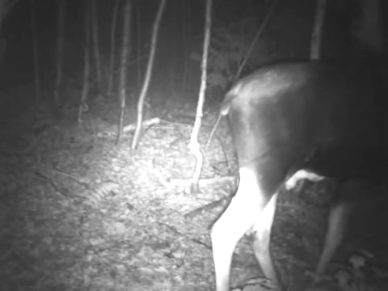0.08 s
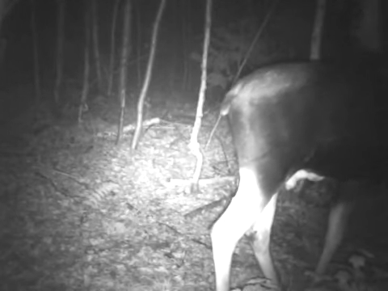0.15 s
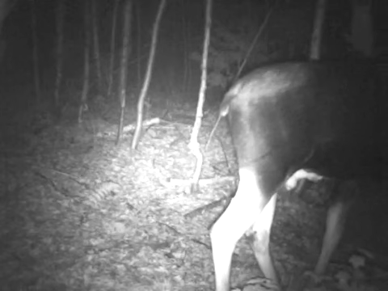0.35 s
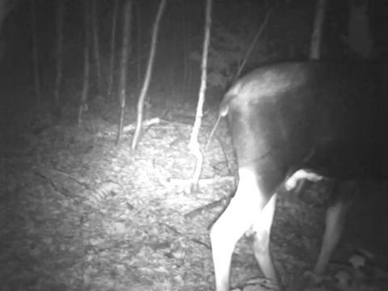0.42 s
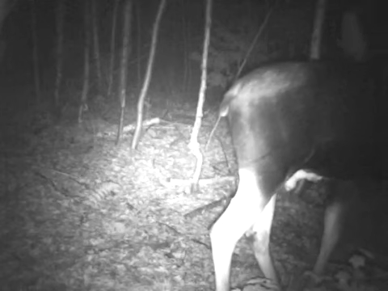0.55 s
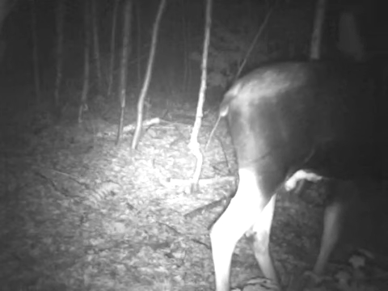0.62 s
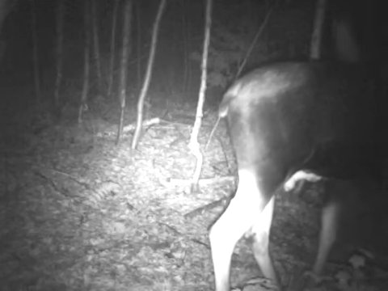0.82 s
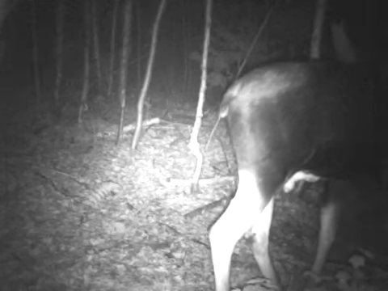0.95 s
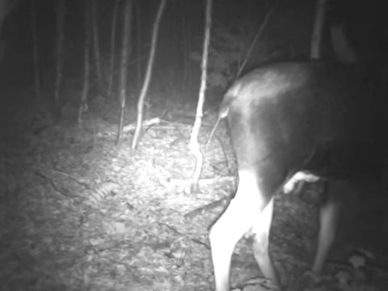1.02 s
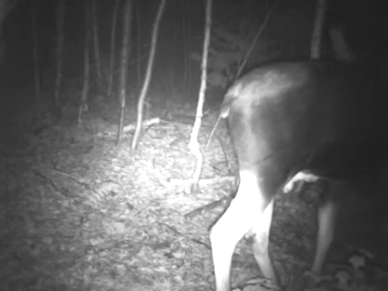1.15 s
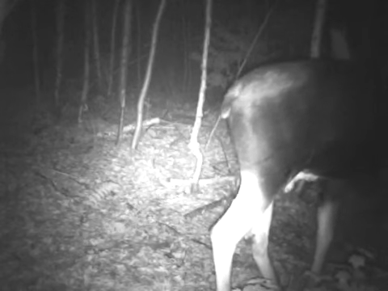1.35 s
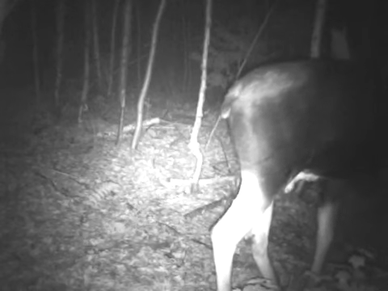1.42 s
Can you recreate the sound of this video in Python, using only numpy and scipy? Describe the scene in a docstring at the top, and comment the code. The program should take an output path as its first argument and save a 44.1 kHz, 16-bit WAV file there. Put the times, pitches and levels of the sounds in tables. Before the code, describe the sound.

A moose gives one short, nasal moan close by, with faint leaves rustling.

```python
"""A cow moose gives one short moan, close by, in a forest at night.
Vocal fold harmonics start as a nasal hum and turn loud as the mouth opens; the pitch sags,
the slack folds creak and a puff of air ends the call. Leaves rustle and twigs snap underfoot.
The trees return a dull tail. Recorder noise swells with the voice over steady microphone hiss."""
import sys
import numpy as np
from scipy import signal
from scipy.fft import rfft, irfft
from scipy.io import wavfile
from scipy.ndimage import uniform_filter1d

SR = 44100
rng = np.random.default_rng(int(sys.argv[2]) if len(sys.argv) > 2 else 0)


def wrap_up_sound(samples):
    """Save the sound to the file named by the first command line argument, as 16-bit audio."""
    columns = np.atleast_2d(samples).T
    # keep every value between -1 and 1, then stretch to whole-number steps
    tamed = np.clip(columns, -1, 1)
    steps = np.round(tamed * 32767).astype(np.int16)
    wavfile.write(sys.argv[1], SR, steps)


N = 66150
T = np.arange(N) / SR
BIN_HZ = np.fft.rfftfreq(N, 1 / SR)


def amp(db):
    """Decibels to gain."""
    return 10 ** (np.asarray(db) / 20)


def unit(x):
    """Scale to rms 1."""
    return x / np.sqrt(np.mean(x ** 2) + 1e-20)


def curves(table):
    """Per-sample curve for each column after time_s."""
    time_s, *columns = np.transpose(table)
    return [np.interp(T, time_s, column) for column in columns]


def at_hz(table, hz):
    """Table lookup on a log-frequency axis."""
    freq_hz, values = np.transpose(table)
    return np.interp(np.log(hz + 1), np.log(freq_hz + 1), values)


def shaped_noise(bin_gain):
    """White noise weighted per FFT bin, rms 1."""
    return unit(irfft(rfft(rng.standard_normal(N)) * bin_gain, N))


def noise(spectrum):
    """Noise coloured by a freq_hz, gain_db table, rms 1."""
    return shaped_noise(amp(at_hz(spectrum, BIN_HZ)))


def wander(rate_hz):
    """Random motion up to about rate_hz, rms 1."""
    return shaped_noise(np.exp(-(BIN_HZ / rate_hz) ** 2))


def ring(start_s, level_db, pitch_hz, t60_s, rise_s):
    """Struck resonance: linear rise, exponential decay."""
    t = np.maximum(T - start_s, 0)
    return np.minimum(t / rise_s, 1) * amp(level_db - 60 * t / t60_s) * np.sin(2 * np.pi * pitch_hz * t)


# time_s, pitch_hz
FOLD_PITCH = [(.03, 399), (.045, 353), (.058, 323.3), (.072, 309.7), (.081, 277), (.097, 257.7),
              (.11, 274.4), (.13, 294), (.16, 302.4), (.215, 309.4), (.27, 303.2), (.33, 291.3),
              (.37, 289.4), (.41, 275.7), (.45, 263), (.485, 252), (.503, 236), (.525, 215)]
# time_s, fundamental_db, overtone_db
VOICE_EFFORT = [(.015, -57, -48), (.035, -34.5, -20), (.052, -40.5, -12), (.09, -53, -5.5),
                (.11, -55.5, -5), (.135, -45, -0.5), (.165, -42.5, 0), (.21, -37, -1), (.3, -40, -.5),
                (.365, -41.5, 1.5), (.41, -32, -0.5), (.445, -32.5, 0.5), (.48, -37.5, -0.5),
                (.515, -52, -3), (.535, -67, -18)]
# time_s, roughness (0-1)
FOLD_ROUGHNESS = [(.05, .08), (.14, .04), (.22, .03), (.28, .18), (.32, .07), (.36, .08), (.383, .22),
                  (.405, .08), (.44, .12), (.48, .1), (.505, .3), (.53, .4)]
# time_s, tension (0 relaxed, 1 pressed)
THROAT_TENSION = [(.245, 0.08), (.295, 0.91), (.37, 1), (.42, 1), (.46, 0.59)]
# freq_hz, gain_db
THROAT_RELAXED = [(530, -38.5), (620, -41), (670, -56.5), (740, -40), (900, -36), (1000, -33.5),
                  (1070, -56), (1200, -45), (1330, -36), (1450, -52), (1550, -44.5), (1700, -40.5),
                  (1830, -45), (1950, -55), (2150, -48), (2450, -53), (2800, -65), (4000, -89)]
THROAT_PRESSED = [(540, -35.5), (580, -31), (870, -32), (1170, -38.5), (1450, -37), (1620, -43),
                  (1750, -34), (1930, -33.5), (2060, -50.5), (2280, -51.5), (2450, -53), (2800, -60),
                  (4000, -79)]
# time_s, level_db, centre_hz, half_width_hz
MOUTH_RESONANCE = [(.108, -59, 1100, 160), (.13, -39, 1120, 161), (.175, -34, 1150, 160),
                   (.2, -29, 1103, 162), (.26, -27, 1134, 163), (.335, -31.5, 1096, 160),
                   (.377, -39, 1121, 180.1), (.384, -20, 1120, 210), (.395, -18, 1065, 257),
                   (.415, -18.5, 1044, 260), (.43, -21.5, 1175, 237), (.448, -11.5, 1270, 185),
                   (.482, -8.5, 1230, 136), (.502, -21.5, 1120, 220), (.508, -28, 1101, 247),
                   (.52, -44, 1085, 250)]


def moan(jitter=0.05, shimmer=0.38, hoarseness=0.75, waver_db=0.76, dull_hz=700):
    """Vocal fold harmonics pass the throat and, once it opens, the resonant mouth."""
    pitch_hz, = curves(FOLD_PITCH)
    fundamental_db, overtone_db = curves(VOICE_EFFORT)
    roughness, = curves(FOLD_ROUGHNESS)
    tension, = curves(THROAT_TENSION)
    mouth_db, centre_hz, half_width_hz = curves(MOUTH_RESONANCE)
    sounding = (T > VOICE_EFFORT[0][0]) & (T < VOICE_EFFORT[-1][0])
    mouth_open = (T > MOUTH_RESONANCE[0][0]) & (T < MOUTH_RESONANCE[-1][0])
    mouth_gain = amp(mouth_db) * mouth_open
    phase = 2 * np.pi * np.cumsum(pitch_hz * (1 + jitter * roughness * wander(rate_hz=117))) / SR
    voice = amp(fundamental_db) * np.cos(phase)
    for harmonic in range(2, 14):
        hz = harmonic * pitch_hz
        effort_db = overtone_db * (hz / dull_hz) ** 0.71  # a soft voice loses its top first
        throat_db = (1 - tension) * at_hz(THROAT_RELAXED, hz) + tension * at_hz(THROAT_PRESSED, hz)
        detune = 1j * (hz - centre_hz) / half_width_hz
        mouth = 1 / ((1 + detune) * (1 + detune + detune ** 2))  # Butterworth band-pass
        gain = np.hypot(amp(effort_db + throat_db), mouth_gain * abs(mouth))
        gain *= amp(waver_db * wander(rate_hz=14))
        tremble = 1 + hoarseness * roughness * (wander(rate_hz=167) + 1j * wander(rate_hz=167))
        carrier = np.exp(1j * (harmonic * phase + np.angle(mouth)))
        voice += gain * (tremble * carrier).real
    return np.sqrt(2) * voice * sounding * (1 + shimmer * roughness * wander(rate_hz=300))


# freq_hz, gain_db, t60_s
MOUTH_MODES = [(850, -8, .019), (1110, -6, .012), (1320, -2, .02)]


def creak(start_s=0.5088, length_s=0.02, rate_hz=205, level_db=-7, spread_db=1.5, fade_db_per_s=130):
    """Slackening folds slap at uneven intervals; each slap rings the mouth."""
    gap_draws, level_draws = rng.uniform(-1.005, 1, (8, 2)).T
    gaps_s = (1 + 0.25 * gap_draws) / rate_hz
    delays_s = np.cumsum(gaps_s) - gaps_s
    slaps_db = level_db + spread_db * level_draws - fade_db_per_s * delays_s
    out = np.zeros(N)
    for delay_s, slap_db in zip(delays_s, slaps_db):
        if delay_s < length_s:
            for freq_hz, gain_db, t60_s in MOUTH_MODES:
                out += ring(start_s + delay_s, slap_db + gain_db, freq_hz, t60_s, rise_s=0.0012)
    return out


# start_s, level_db, pitch_hz, t60_s
MOUTH_POPS = [(0.3802, -10, 1260, 0.036), (.528, -22, 319.2, .09), (0.5283, -27.5, 427, 0.066),
              (.572, -27, 440, .045)]


def pops():
    """Hollow rings as the lips part and the throat closes."""
    return sum(ring(*pop, rise_s=0.0017) for pop in MOUTH_POPS)


# start_s, level_db
PUFF_PUSHES = [(.507, -26.5), (.553, -30.5)]
# freq_hz, gain_db
PUFF_SPECTRUM = [(40, -21), (130, -23), (210, -26), (310, -2.5), (400, 4), (470, 3), (680, -12), (880, 2),
                 (1300, -1), (1700, -14.5), (2300, -25), (5000, -32.5), (10000, -41), (15000, -62)]


def puff(attack_s=0.0042, decay_s=0.037):
    """The folds part and the remaining air leaves in two quick pushes."""
    envelope = np.zeros(N)
    for start_s, level_db in PUFF_PUSHES:
        t = np.maximum(T - start_s, 0)
        envelope += amp(level_db) * np.minimum(t / attack_s, 1) * np.exp(-t / decay_s)
    return envelope * noise(PUFF_SPECTRUM)


# freq_hz, gain_db
ECHO_SPECTRUM = [(100, -20.5), (220, -13), (295, -2), (345, 9), (450, 6), (540, -4), (700, -8), (900, -1),
                 (1080, 0), (1290, -6), (1600, -.5), (2500, 0.5), (8000, -9)]
# freq_hz, t60_s
FAR_DECAY = [(200, 1.3), (500, 1.22), (1200, 1.14), (3000, 0.653), (8000, 0.36)]


def forest_echoes(call, near_db=-23, far_db=-32, near_t60_s=0.28, rise_s=0.023):
    """Quick echoes from near trunks, a long tail from far ones."""
    onset = np.minimum(T / rise_s, 1) ** 2
    freq_hz, time_s, frames = signal.stft(noise(ECHO_SPECTRUM), SR, nperseg=256)
    decay = amp(-60 * time_s / at_hz(FAR_DECAY, freq_hz)[:, None])
    far = signal.istft(frames * decay, SR)[1][:N]
    near = noise(ECHO_SPECTRUM) * amp(-60 * T / near_t60_s)
    response = amp(far_db) * unit(far * onset) + amp(near_db) * unit(near * onset)
    return signal.fftconvolve(call, response / np.sqrt(N))[:N]


def thud(peak_s=0.567, half_width_s=0.014, level_db=-39.5, pitch_hz=135):
    """Soft low bump, like a hoof settling on the ground."""
    t = T - peak_s
    return amp(level_db) * np.exp(-(t / half_width_s) ** 2) * np.sin(2 * np.pi * pitch_hz * t)


# peak_s, half_width_s, level_db, centre_hz
LEAF_RUSTLES = [(0.263, .016, -58, 3670), (0.372, 0.023, -47, 3600), (0.529, 0.016, -43.5, 2670),
                (0.604, 0.021, -52.5, 3900)]


def leaves(width_octaves=0.37, top_hz=9000):
    """Leaves rustle under the shifting animal: brief bands of treble noise."""
    hz = BIN_HZ + 1
    rolloff = np.exp(-(hz / top_hz) ** 2)
    out = np.zeros(N)
    for peak_s, half_width_s, level_db, centre_hz in LEAF_RUSTLES:
        band = rolloff / np.hypot(1, 2 * np.log2(hz / centre_hz) / width_octaves)
        envelope = amp(level_db) * np.exp(-((T - peak_s) / half_width_s) ** 2)
        out += envelope * shaped_noise(band)
    return out


# start_s, level_db, pitch_hz, t60_s
TWIG_SNAPS = [(.244, -37, 4400, .009), (1.237, -39, 3050, .003)]


def twigs():
    """Dry twigs snap underfoot with tiny sharp ticks."""
    return sum(ring(*snap, rise_s=0.0002) for snap in TWIG_SNAPS)


# freq_hz, gain_db
RECORDER_NOISE_SPECTRUM = [(30, -21), (190, -13), (400, -2.5), (1200, -4), (2300, 3), (3200, -6),
                           (4200, -6), (10000, -8), (12500, -14), (14000, -26), (16000, -36.5)]
RUMBLE_SPECTRUM = [(20, 1), (90, 5), (150, -10), (260, -10), (800, -54)]


def recorder_noise(voice, hiss_gain=0.02158, rumble_db=-44, rumble_knee=0.15):
    """Recorder hiss that follows the voice's level, plus low rumble when it is loud."""
    envelope = uniform_filter1d(abs(signal.hilbert(voice)), size=30)
    local_mean = uniform_filter1d(envelope, size=180)
    loudness = uniform_filter1d(envelope, size=900)
    peak_emphasis = (np.maximum(envelope, 0) / (abs(local_mean) + 1e-9)) ** 0.3
    rumble = amp(rumble_db) * np.tanh((loudness / rumble_knee) ** 3) * noise(RUMBLE_SPECTRUM)
    hiss = hiss_gain * envelope ** 1.02 * peak_emphasis * noise(RECORDER_NOISE_SPECTRUM)
    return hiss + rumble


# freq_hz, gain_db
HISS_SPECTRUM = [(30, -15), (80, -2), (130, -11), (200, -6), (420, 2), (700, -2), (1300, -3), (2200, -7),
                 (5000, -10), (10000, -12), (12000, -17), (13500, -32), (15500, -54)]


def microphone_hiss(level_db=-52):
    """Steady noise floor of the microphone."""
    return amp(level_db) * noise(HISS_SPECTRUM)


def scene():
    """Mono mix: call, recorder noise, echoes, ground sounds, hiss."""
    voice = moan() + creak()
    call = voice + pops() + puff()
    mix = call + recorder_noise(voice) + forest_echoes(call)
    mix += thud() + leaves() + twigs() + microphone_hiss()
    return mix[None]


def record(dry, ceiling=0.77, cutoff_hz=15700):
    """Soft input overload, then a low-pass."""
    rounded = dry / (1 + (dry / ceiling) ** 8) ** (1 / 8)
    lowpass = signal.firwin(511, cutoff_hz, window=("kaiser", 9), fs=SR)
    return signal.oaconvolve(rounded, lowpass[None], "same")


dry = scene()
out = record(dry)
wrap_up_sound(out)
```